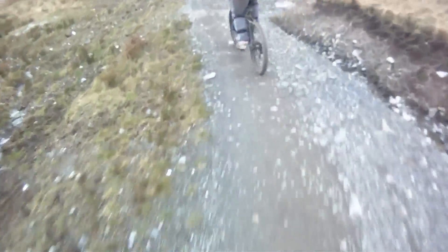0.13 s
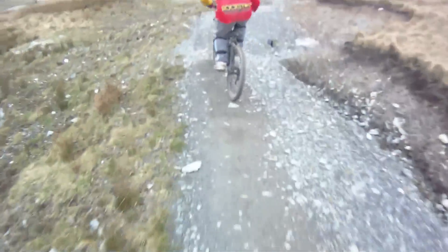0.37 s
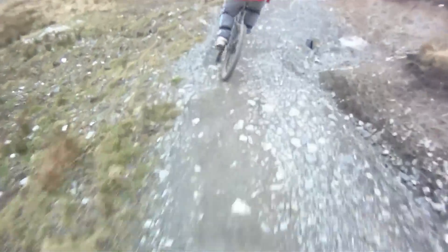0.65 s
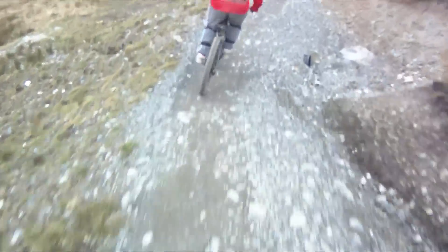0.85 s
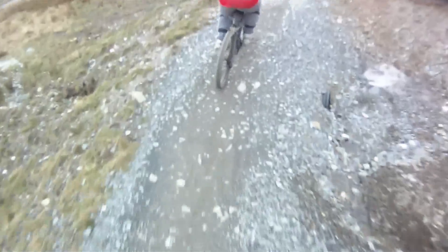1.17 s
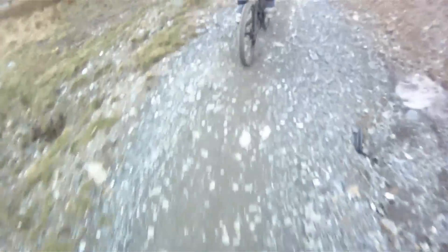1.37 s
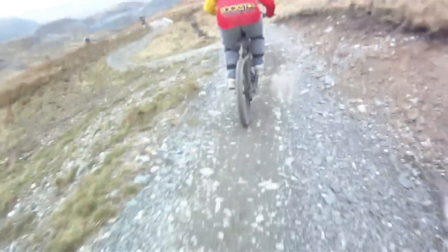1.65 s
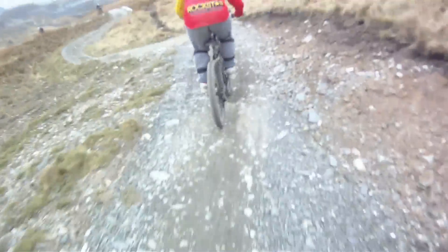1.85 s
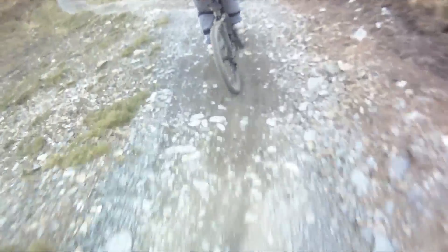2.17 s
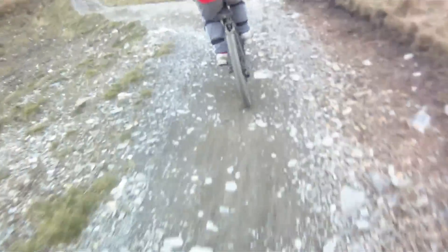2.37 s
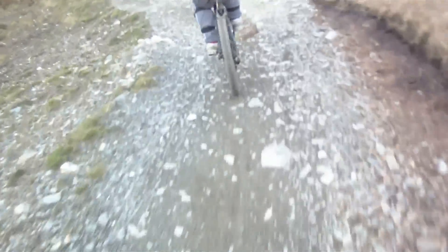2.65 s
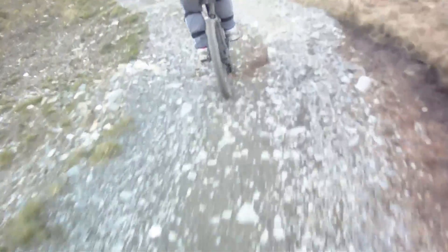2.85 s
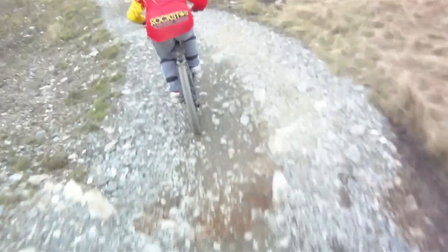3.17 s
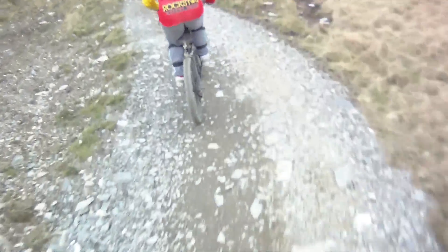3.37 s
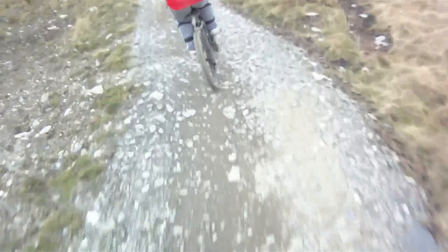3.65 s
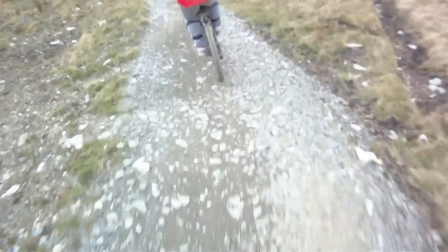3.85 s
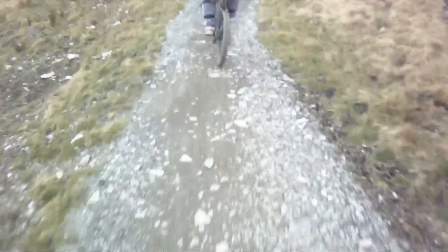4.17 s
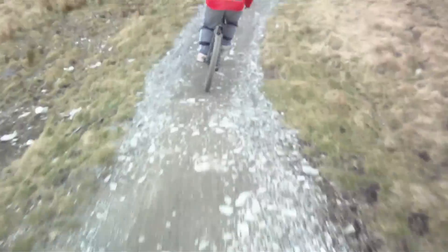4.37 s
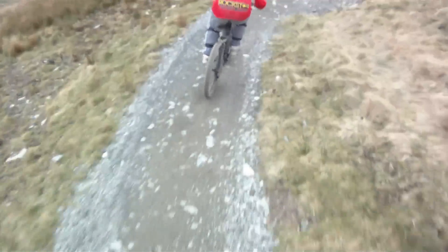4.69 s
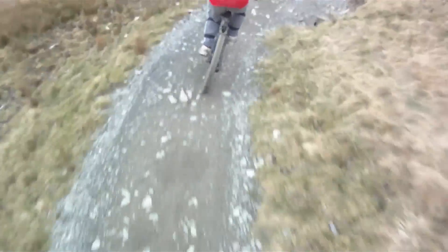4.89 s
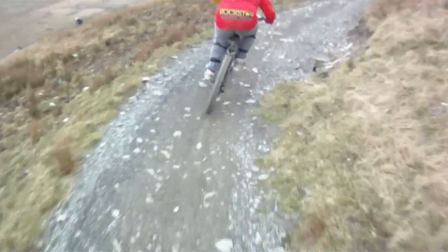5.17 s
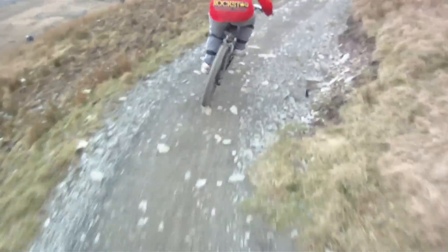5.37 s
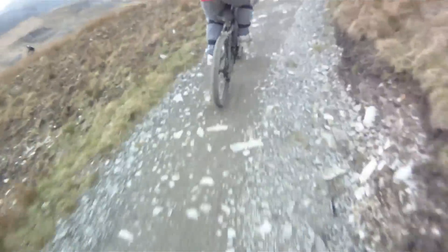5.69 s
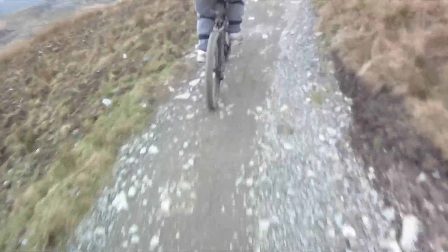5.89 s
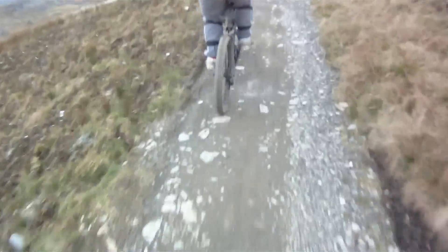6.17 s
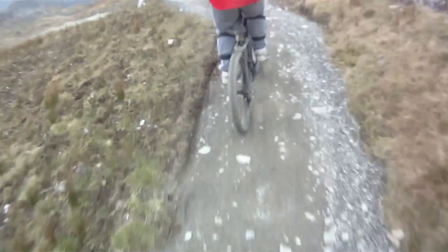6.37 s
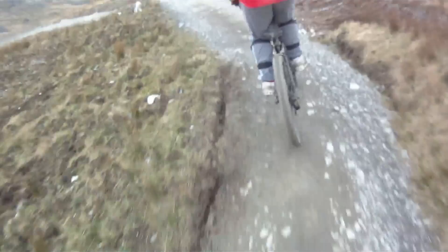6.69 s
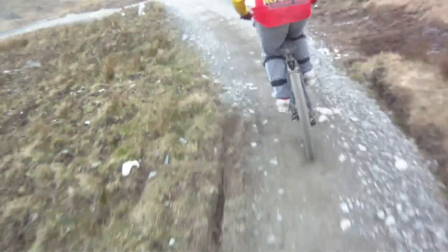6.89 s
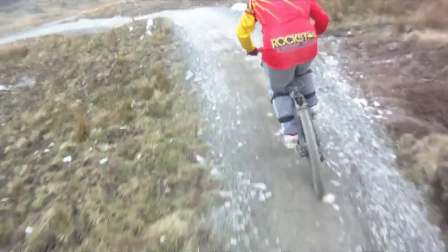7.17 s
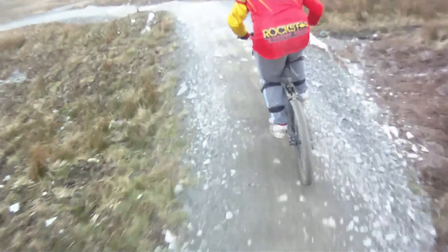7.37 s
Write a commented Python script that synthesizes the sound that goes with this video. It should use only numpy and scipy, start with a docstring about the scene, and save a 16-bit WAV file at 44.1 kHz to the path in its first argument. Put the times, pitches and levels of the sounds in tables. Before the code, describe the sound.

Bike tyres crunch quickly along a gravel trail, making a hollow, uneven rumble in the closed housing around the microphone. Stones tick and scrape, jolts knock dully, and a loose metal part jingles faintly. Wind buffeting and heavier bumps build about halfway through, with one sharp crack of a stone hitting the housing, before the ride settles. A very faint electronic buzz comes and goes.

```python
"""A mountain bike rumbles fast over loose stones, heard from inside a small closed camera housing.
Wind and jolts shake the shell, with deep buffeting below, rustle on top and dull knocks through the mount.
Gravel crunches in grains, and stones tick and scrape, all ringing the shell's modes; one flung stone
cracks on it. A loose metal part jingles and a thin squeak slips by.
Far behind, the electronics hiss, whine and buzz faintly in spells."""
import sys
import numpy as np
from scipy import signal
from scipy.io import wavfile
from scipy.ndimage import uniform_filter1d

SR = 44100
rng = np.random.default_rng(int(sys.argv[2]) if len(sys.argv) > 2 else 0)


def store_wav(level_fs):
    """Save 16-bit WAV to argv[1]."""
    pcm = np.round(np.clip(np.atleast_2d(level_fs), -1, 1) * 32767)
    wavfile.write(sys.argv[1], SR, pcm.T.astype(np.int16))


N = 332498

# Fader moves of the ride: time_s, rumble_db, rustle_re_rumble_db, crunch_db
RIDE_LEVELS = [(0.0, -55.5, -45, -72), (0.12, -49, -9.5, -65), (0.21, -59, -16, -72),
               (0.25, -49.5, -14, -66.5), (0.78, -47.5, -17, -67), (1.47, -52.5, -16, -68.5),
               (1.97, -50.5, -19.5, -71), (2.01, -54.5, -22, -73), (2.58, -54.5, -20, -68),
               (2.85, -55, -24, -70), (3.0, -49.5, -17, -63), (3.13, -52.5, -22, -67),
               (3.23, -51.5, -18, -68.5), (3.38, -53, -17.5, -69.5), (3.63, -46, -15.5, -63),
               (3.86, -50, -15, -65.5), (3.97, -46, -10.5, -62.5), (4.43, -42, -13, -54.5),
               (4.53, -39.5, -11, -54.5), (4.66, -39.5, -12, -54), (4.71, -38, -18.5, -59.5),
               (4.86, -37.5, -8.5, -53), (4.96, -42, -10.5, -56), (5.1, -38.5, -15.5, -57.5),
               (5.24, -38.5, -13, -55.5), (5.36, -45.5, -13, -60.5), (5.56, -42, -14.5, -61.5),
               (5.69, -44.5, -20, -63), (5.76, -50, -10, -64.5), (5.94, -48.5, -19, -68),
               (6.47, -49.5, -20, -70), (6.74, -57, -14, -68.5), (6.93, -52.5, -32, -74.5),
               (7.12, -62, -24, -69.5), (7.31, -53, -20, -71.5), (7.54, -59.5, -33, -70)]
# Tone of the shell's rumble: freq_hz, density_db
RUMBLE_SPECTRUM = [(88, -13), (150, -5), (307, -1.5), (382, -1), (462, -2), (533, 1.5), (1050, -29.5),
                   (1430, -26.5), (2420, -120)]
# Tone of the deep wind: freq_hz, density_db
BUFFET_SPECTRUM = [(12, -57), (20, -10.5), (46, -1.5), (81, 2), (220, -3.5), (290, -12.5), (480, -120)]
# Swells of the deep wind: time_s, level_db
GUST_LEVELS = [(0.0, -30), (0.02, -61), (0.92, -58.5), (1.17, -51.5), (2.12, -68), (4.26, -53.5),
               (4.3, -43.5), (4.51, -51), (4.77, -43), (4.93, -50), (4.98, -44), (5.61, -47), (5.71, -57.5),
               (7.54, -69.5)]
# Tone of the rustle: freq_hz, density_db
RUSTLE_SPECTRUM = [(600, 3), (900, 6), (1300, 4.5), (2000, 0), (3000, -16)]
# Dull blows through the mount: start_s, level_db, pitch_hz
MOUNT_KNOCKS = [(0.083, -45, 472), (0.38, -39, 556), (0.409, -38, 524), (0.427, -49, 550),
                (0.524, -51, 596), (0.616, -41, 368), (0.769, -40, 544), (1.013, -37, 550),
                (1.425, -35, 440), (1.437, -40, 596), (1.625, -39.5, 515), (1.751, -44, 410),
                (2.888, -39.5, 535), (3.227, -39, 493), (3.344, -41, 415), (3.543, -39.5, 540),
                (3.711, -35, 554), (4.14, -43, 420), (4.289, -26.5, 533), (4.338, -29, 590),
                (4.6073, -22, 574), (4.651, -38, 482), (4.692, -31, 565), (4.706, -24.5, 554),
                (4.825, -36, 396), (4.889, -30.5, 534), (4.961, -34, 465), (5.051, -35, 470),
                (5.203, -43, 397), (5.212, -39, 566), (5.231, -30, 453), (5.276, -32.5, 466),
                (5.422, -30, 444), (5.773, -46, 506), (5.85, -37.5, 427), (6.0, -43, 560),
                (6.072, -39, 470), (6.249, -37, 530), (6.265, -32.5, 470), (6.4275, -41, 550),
                (6.469, -45, 503), (6.48, -46, 593), (6.544, -38, 362)]
# How the shell rings: pitch_hz, crunch_gain_db, t60_s
SHELL_MODES = [(1160, -21, 0.0072), (1790, -31, 0.0031), (2154, -19, 0.0037), (2450, -0.5, 0.0058),
               (3034, -2, 0.0062), (3620, 1, 0.0028), (4020, -16, 0.0067), (5000, -15, 0.0032),
               (5770, -11, 0.0025), (6670, -40, 0.0048), (8000, -40, 0.0029), (8800, -27, 0.0017),
               (10400, -29, 0.0029), (11500, -35, 0.00087), (14000, -36, 0.0016)]
# Stones and small hard parts hitting frame and shell: start_s, body_db, body_hz, clink_db, clink_hz
STONE_TICKS = [(0.0956, -43.5, 2260, -68, 5890), (0.1344, -58, 2330, -65, 8770),
               (0.2563, -35.5, 1590, -69, 6840), (0.2932, -41.5, 2040, -76, 5150),
               (0.506, -56, 2380, -66, 6620), (0.55, -41, 1670, -71, 6520), (0.5594, -37, 1680, -59, 6700),
               (0.6433, -45, 2430, -52, 5660), (0.7158, -43, 1770, -54, 6750),
               (0.733, -39, 1900, -75, 5660), (1.0234, -62, 2350, -59, 5250),
               (1.1146, -42, 1790, -78, 6810), (1.4148, -45, 3110, -79, 6180),
               (1.4266, -31.5, 1580, -75, 6540), (1.491, -49, 4050, -77, 5060),
               (1.5168, -45, 2080, -76, 5010), (1.752, -54, 3050, -70, 7940),
               (2.0756, -42.5, 2670, -77, 5140), (2.4248, -39, 2920, -77, 5560),
               (2.4714, -67, 1540, -66, 7570), (2.6192, -40, 4050, -58, 7940),
               (2.7832, -42, 2600, -72, 6050), (2.7925, -35, 2070, -53, 6300),
               (2.8073, -45, 2130, -67, 5880), (2.8619, -41.5, 2560, -62, 8520),
               (2.9234, -64, 3030, -66, 7800), (2.958, -53, 3070, -74, 5890),
               (2.9931, -55, 2330, -77, 6440), (3.0374, -52, 2450, -65, 5630),
               (3.113, -43, 2250, -65, 10500), (3.168, -63, 3000, -64, 7730),
               (3.2784, -42, 3240, -79, 5830), (3.3192, -35, 2160, -80, 5890),
               (3.47, -43, 2350, -56.5, 5890), (3.533, -48, 3600, -72, 6500),
               (3.5534, -36.5, 1650, -63, 6450), (3.5778, -41.5, 3770, -79, 5020),
               (3.6102, -49, 2400, -64, 7940), (3.627, -49, 1570, -60, 8100),
               (3.712, -36.5, 2960, -43.5, 5550), (3.746, -36.5, 1530, -52, 5950),
               (3.7785, -40.5, 2960, -71, 5880), (3.799, -53, 3000, -61, 8000),
               (3.8144, -36.5, 4000, -78, 5130), (3.8984, -71, 3010, -60, 6100),
               (3.9424, -39, 2400, -70, 5020), (3.9838, -34.5, 2260, -72, 5180),
               (4.0054, -60, 3100, -65, 7990), (4.0457, -58, 3000, -65, 7710),
               (4.062, -50, 2840, -56, 9380), (4.07, -37, 3770, -77, 5140),
               (4.1654, -44, 1560, -49.5, 6150), (4.2512, -39, 1970, -69, 5960),
               (4.2872, -58, 1940, -54, 6650), (4.359, -60, 2200, -60, 7000),
               (4.3644, -53, 2180, -50, 5170), (4.3924, -42, 1570, -55, 5880),
               (4.4448, -24, 1620, -46.5, 5630), (4.5615, -35, 1930, -53, 5930),
               (4.6068, -26, 1650, -51, 6260), (4.6259, -38, 2480, -58, 6680),
               (4.6504, -47, 2010, -64, 6630), (4.6614, -48, 1540, -52, 5940),
               (4.7755, -47, 1550, -64, 5290), (4.8476, -48, 2260, -55, 5670),
               (4.9197, -30, 1900, -68, 6610), (4.936, -36, 2400, -73, 8000),
               (4.9621, -27, 1610, -69, 5850), (5.2024, -45, 2070, -64, 5800),
               (5.212, -34, 1560, -51, 9800), (5.231, -34, 1540, -65, 6750), (5.3735, -46, 1500, -77, 6240),
               (5.411, -58, 3250, -63, 8500), (5.4212, -37, 3000, -74, 5920), (5.44, -34, 1700, -75, 5450),
               (5.4576, -39, 2400, -75, 5450), (5.471, -38, 2600, -59, 6200), (5.546, -41, 3000, -62, 5400),
               (5.812, -45, 2430, -62.5, 7990), (5.837, -41, 1500, -78, 6000),
               (5.8494, -43, 2300, -75, 6430), (5.8846, -44, 3120, -61, 5550),
               (5.917, -52, 3300, -65, 8480), (6.0796, -42.5, 3100, -75, 5520),
               (6.1619, -42, 2940, -76, 6730), (6.185, -36, 1530, -61, 6240),
               (6.2495, -49, 3860, -75, 5000), (6.469, -49, 1400, -80, 5500), (6.481, -48, 1400, -80, 5500),
               (6.545, -46, 1500, -80, 5500), (6.6174, -47, 2930, -63, 6010), (6.666, -49, 2410, -77, 5810),
               (6.8129, -60, 2500, -64, 8050), (6.889, -45.5, 2530, -73, 5920),
               (6.9558, -43.5, 2800, -58, 6500), (7.222, -47.5, 2290, -77, 6690),
               (7.3932, -52, 3050, -63, 9590), (7.4917, -46, 2260, -63, 5490)]
# Stones grinding for a moment: middle_s, length_s, drive_db, centre_hz
STONE_SCRAPES = [(.096, 0.017, -54.5, 2270), (.118, .014, -55.5, 2280), (0.262, 0.02, -59, 1890),
                 (0.506, 0.0094, -56, 2650), (0.721, 0.032, -59, 3020), (2.808, 0.043, -57, 3400),
                 (2.967, 0.026, -63, 2560), (3.007, 0.021, -65, 2200), (3.07, 0.029, -63, 2660),
                 (3.244, 0.034, -61, 2600), (3.33, 0.016, -54, 2200), (3.715, 0.022, -47, 2300),
                 (4.407, 0.056, -52.5, 2670), (4.45, 0.031, -49, 2220), (4.59, 0.025, -49.5, 3830),
                 (4.714, 0.03, -51, 2940), (4.78, .024, -48.5, 3080), (4.844, 0.038, -48.5, 3200),
                 (5.525, 0.0096, -58, 3460), (5.55, .018, -50, 3250), (6.251, 0.019, -50.5, 2970),
                 (6.33, 0.024, -63, 3060), (6.477, 0.022, -59, 1700), (6.623, 0.022, -57.5, 2870),
                 (6.671, 0.022, -67, 2620), (6.76, 0.087, -67, 3100), (6.952, 0.036, -60.5, 2760)]
# What the flung stone sets ringing: pitch_hz, peak_db, rise_s
CRACK_MODES = [(3170, -28, 0.0012), (4070, -34.5, 0.00059), (5780, -26.5, 0.0003), (6500, -35, 0.00042),
               (7940, -31, 0.00037), (9400, -50, 0.00051), (11500, -52, .0003), (14000, -48, .0003)]
# Jolts to the loose metal part: start_s, drive_db
JINGLE_SHAKES = [(.644, -69), (0.716, -69), (5.539, -66)]
# How that part rings: pitch_hz, gain_db, t60_s
JINGLE_MODES = [(5300, 1.5, 0.014), (6500, -0.5, 0.0092), (7630, -2, .008)]
# When the electronics buzz: start_s, end_s
BUZZ_SPANS = [(1.555, 1.73), (1.78, 2.285), (3.95, 4.66), (6.27, 6.31), (6.35, 6.97)]
# Treble bands rung by the current and its noise: centre_hz, width_hz, gain_db, noise_db
BUZZ_BANDS = [(5840, 930, -3.5, -23), (8400, 1200, -6, -16), (11000, 1700, -6, -11),
              (12450, 1000, -0.5, -29), (14000, 1600, -3, -22), (15100, 1000, -3, -20),
              (9700, 600, -14, -20)]
# Tone of the electronic hiss: freq_hz, density_db
HISS_SPECTRUM = [(3150, -12), (4900, -1), (6050, -4.5), (9000, -6), (12500, -9), (13500, -13), (16100, 5)]

TIME_S = np.arange(N) / SR


def shell_rumble(bumps, jolts_db):
    """Wind and dense little bumps rumble in the shell, surging with the jolts."""
    return shaped_bands(RUMBLE_SPECTRUM, flicker_db=1.2, surge_db=0.5 * jolts_db, drive=bumps)


def wind_buffeting(jolts_db):
    """Gusts lay a deep, swelling low end under the ride."""
    level_db = np.interp(TIME_S, *np.transpose(GUST_LEVELS))
    return from_db(level_db) * shaped_bands(BUFFET_SPECTRUM, flicker_db=0.78, surge_db=0.13 * jolts_db)


def rustle(bumps, jolts_db):
    """The bumps give a grainy midrange that jumps with every jolt."""
    return shaped_bands(RUSTLE_SPECTRUM, flicker_db=1.75, surge_db=jolts_db, drive=bumps)


def mount_knocks(peak_cycles=0.86, length=2000):
    """A quick blow rings the mount for a cycle or two, sinking slightly in pitch."""
    out = np.zeros(N + length)
    for start_s, level_db, hz in MOUNT_KNOCKS:
        cycles = hz * TIME_S[:length]
        envelope = (cycles / peak_cycles * np.exp(1 - cycles / peak_cycles)) ** 3.3
        i = round(start_s * SR)
        out[i:i + length] += from_db(level_db + 1) * envelope * np.sin(2 * np.pi * cycles ** 0.99)
    return out[:N]


def stone_strikes(chatter_s=0.0017, length=1500):
    """Each stone chatters in the shell modes near its body and clink; scrapes ring the same modes."""
    out, age_s = np.zeros(N), TIME_S[:length]
    grit = grains(per_s=760, spread_db=3.5)
    noise = rng.standard_normal((len(STONE_TICKS), len(SHELL_MODES), length))
    attack = 1 - np.exp(-age_s / 0.00046)
    for mode, (hz, _, t60_s) in enumerate(SHELL_MODES):
        clicks = np.zeros(N + length)
        fade = age_s / chatter_s * (hz / 2240) ** 0.081  # higher modes chatter more briefly
        envelope = attack * (np.exp(-fade) + 0.14 * np.exp(-fade / 12))
        for tick, (start_s, body_db, body_hz, clink_db, clink_hz) in enumerate(STONE_TICKS):
            body = from_db(body_db - 19.5) * reach(hz, body_hz, drop_db=5.4, octaves=0.43)
            clink = from_db(clink_db - 11.5) * reach(hz, clink_hz, drop_db=3.3, octaves=0.27)
            chatter = noise[tick, mode] * envelope
            chatter[0] = 6 * np.sign(noise[tick, 0, 0])  # first contact hits all modes together
            i = round(start_s * SR)
            clicks[i:i + length] += (body + clink) * chatter
        contacts = clicks[:N] + scrape_swells(hz) * grit
        out += ring(soften(soften(contacts, hz), hz), hz, t60_s)
    return out


def scrape_swells(hz):
    """How hard grinding stones drive one mode: a smooth swell each, strongest near its centre pitch."""
    swells = np.zeros(N)
    for middle_s, length_s, drive_db, centre_hz in STONE_SCRAPES:
        span = np.arange(round((middle_s - 2 * length_s) * SR), round((middle_s + 2 * length_s) * SR))
        envelope = np.exp(-(2 * (span / SR - middle_s) / length_s) ** 2)
        swells[span] += from_db(drive_db) * reach(hz, centre_hz, drop_db=5.8, octaves=0.45) * envelope
    return swells


def stone_crack(start_s=4.8991, length=2000):
    """A flung stone hits the shell: the high modes flash, the lowest swells as the crack spreads to it."""
    out, age_s, i = np.zeros(N), TIME_S[:length], round(start_s * SR)
    for hz, peak_db, rise_s in CRACK_MODES:
        envelope = age_s / rise_s * np.exp(1 - age_s / rise_s)
        out[i:i + length] += from_db(peak_db) * envelope * np.sin(2 * np.pi * hz * age_s)
    return out


def gravel_crunch(jolts_db):
    """Grit under the tyres, clumped by the jolts; each grain strikes some of the shell's modes."""
    grit = grains(per_s=750 * from_db(0.8 * jolts_db + 2.5 * drift(90)), spread_db=3.5)
    bed = from_db(-17 + 0.63 * jolts_db) * rng.standard_normal(N)  # the finest grit merges into noise
    out = np.zeros(N)
    for hz, gain_db, t60_s in SHELL_MODES:
        flicker_db = 1.45 * drift(19)  # each mode is fed unevenly
        contacts = grit * (rng.random(N) < 0.65) + bed
        out += from_db(gain_db + flicker_db) * ring(soften(contacts, hz), hz, t60_s)
    return unit_rms(out)


def fine_grit(jolts_db):
    """Sparse tiny grains tick high and dry on the shell."""
    out = np.zeros(N)
    for hz, gain_db, t60_s in (6270, 0, 0.0038), (8300, -10, 0.0042):
        ticks = grains(per_s=120 * from_db(2.1 * jolts_db), spread_db=12)
        out += from_db(gain_db) * ring(soften(ticks, hz), hz, t60_s)
    return from_db(-24) * unit_rms(out)


def metal_jingle(decay_s=0.012):
    """A loose part rattles for a moment and rings at its own pitches."""
    shake = sum(from_db(drive_db) * (TIME_S > start_s) * np.exp(-np.abs(TIME_S - start_s) / decay_s)
                for start_s, drive_db in JINGLE_SHAKES)
    return sum(from_db(gain_db - 9.5) * ring(shake * rng.standard_normal(N), hz, t60_s)
               for hz, gain_db, t60_s in JINGLE_MODES)


def squeak(start_s=0.332, end_s=0.39, pitch_hz=6260, level_db=-69.5):
    """One thin, fluttering whistle, sinking a little."""
    progress = np.clip((TIME_S - start_s) / (end_s - start_s), 0, 1)
    cycles = np.cumsum(pitch_hz * (1 - 0.017 * progress)) / SR
    return from_db(level_db + 5.4 * drift(120)) * np.sin(np.pi * progress) * np.sin(2 * np.pi * cycles)


def current_buzz(pulse_hz=281, slips_per_s=12, level_db=-77):
    """Current pulses, strong and weak in turn, now and then slipping a step, ring the treble bands."""
    beat = np.floor(np.cumsum(pulse_hz * (1 + 0.0027 * drift(20))) / SR)
    slips = np.cumsum(rng.random(N) < slips_per_s / SR)
    accents = np.where((beat + slips) % 2 < 1, 1, 0.3)
    pulses = np.diff(beat, prepend=0) * accents * from_db(1.9 * rng.standard_normal(N))
    noise, out = rng.standard_normal(N), np.zeros(N)
    for hz, width_hz, gain_db, noise_db in BUZZ_BANDS:
        t60_s = np.log(1000) / np.pi / width_hz
        band = ring(pulses + from_db(noise_db) * noise, hz, t60_s)
        out += from_db(gain_db) * unit_rms(ring(band, hz, t60_s))  # rung twice for steep flanks
    gate = sum((TIME_S > start_s) & (TIME_S < end_s) for start_s, end_s in BUZZ_SPANS)
    return from_db(level_db) * unit_rms(out) * uniform_filter1d(gate.astype(float), size=300)


def electronic_hiss(hiss_db=-79.5, whine_hz=11149, whine_db=-104):
    """The electronics' noise floor: bright hiss with a hair-thin whine."""
    hiss = from_db(hiss_db) * shaped_bands(HISS_SPECTRUM, flicker_db=0.76, surge_db=0)
    return hiss + from_db(whine_db) * np.sin(2 * np.pi * whine_hz * TIME_S)


def shaped_bands(spectrum, flicker_db, surge_db, drive=None):
    """Third-octave bands of noise or grains, surging together and flickering alone; rms 1."""
    hz, density_db = np.transpose(spectrum)
    edges = hz[0] * 2 ** np.arange(0, np.log2(hz[-1] / hz[0]) + 0.01, 1 / 3)
    drive = rng.standard_normal((2, N)) if drive is None else drive
    out = np.zeros(N)
    for k, (low, high) in enumerate(zip(edges, edges[1:])):
        bandpass = signal.butter(2, [low, high], "band", fs=SR, output="sos")
        band = signal.sosfilt(bandpass, drive[k % 2])  # neighbours take turns on the two drives
        band_db = np.interp(np.log(low * high) / 2, np.log(hz), density_db)
        out += band * from_db(band_db + surge_db + flicker_db * drift(6.3))
    return unit_rms(out)


def grains(per_s, spread_db):
    """Random clicks, most small, a few large."""
    sizes = from_db(spread_db * np.minimum(rng.exponential(1, N), 4)) * rng.choice([-1, 1], N)
    return sizes * (rng.random(N) < per_s / SR)


def reach(hz, centre_hz, drop_db, octaves):
    """Bell-shaped gain round a contact's centre pitch, drop_db down at `octaves` away."""
    return from_db(-drop_db * (np.log2(hz / centre_hz) / octaves) ** 2)


def soften(clicks, hz):
    """A contact is not instant: a wide band round the mode takes the edge off."""
    bandpass = signal.butter(1, [hz / 1.5, hz * 1.3], "band", fs=SR, output="sos")
    return signal.sosfilt(bandpass, clicks + 1e-18)


def ring(clicks, hz, t60_s):
    """A unit click sets off a dying sine of height 1."""
    decay, step = from_db(-60 / (t60_s * SR)), 2 * np.pi * hz / SR
    return signal.lfilter([0, np.sin(step)], [1, -2 * decay * np.cos(step), decay ** 2], clicks + 1e-18)


def drift(rate_hz, hop=40):
    """Smooth random modulation: twice low-passed noise, rms 1."""
    pole = np.exp(-2 * np.pi * rate_hz * hop / SR)
    slow = signal.lfilter([1], [1, -2 * pole, pole ** 2], rng.standard_normal(N // hop + 2002))[2000:]
    return np.interp(np.arange(N) / hop, np.arange(len(slow)), unit_rms(slow))


def from_db(db):
    """Gain of a level in dB."""
    return 10 ** (np.asarray(db) / 20)


def unit_rms(x):
    """Scaled to rms 1."""
    return x / np.sqrt(np.mean(x ** 2) + 1e-20)


def scene():
    """Mono mix: rumble, wind, rustle and gravel share the jolts; hits on top, electronics behind."""
    times_s, *faders = np.transpose(RIDE_LEVELS)
    rumble_db, rustle_db, crunch_db = [np.interp(TIME_S, times_s, fader) for fader in faders]
    jolts_db = 2 * drift(13) + 1.5 * drift(70)
    bumps = np.array([grains(per_s=1500, spread_db=3) for _ in range(2)])
    scuffs = from_db(9.5) * grains(per_s=150, spread_db=4)  # sparser, harder grains
    rumble = from_db(rumble_db) * shell_rumble(bumps, jolts_db)
    wind = wind_buffeting(jolts_db)
    rustling = from_db(rumble_db + rustle_db) * rustle(bumps + scuffs, jolts_db)
    gravel = from_db(crunch_db) * (gravel_crunch(jolts_db) + fine_grit(jolts_db))
    electronics = current_buzz() + electronic_hiss()
    hits = mount_knocks() + stone_strikes() + stone_crack() + metal_jingle()
    return (rumble + wind + rustling + gravel + hits + squeak() + electronics)[None]


def record(dry, cutoff_hz=15290):
    """Two steep low-passes shave off the very top."""
    top_cut = signal.cheby2(8, 30, 17000, fs=SR, output="sos")
    brick_wall = signal.ellip(12, 0.5, 32, cutoff_hz, fs=SR, output="sos")
    return signal.sosfilt(brick_wall, signal.sosfilt(top_cut, dry))


dry = scene()
out = record(dry)
store_wav(out)
```